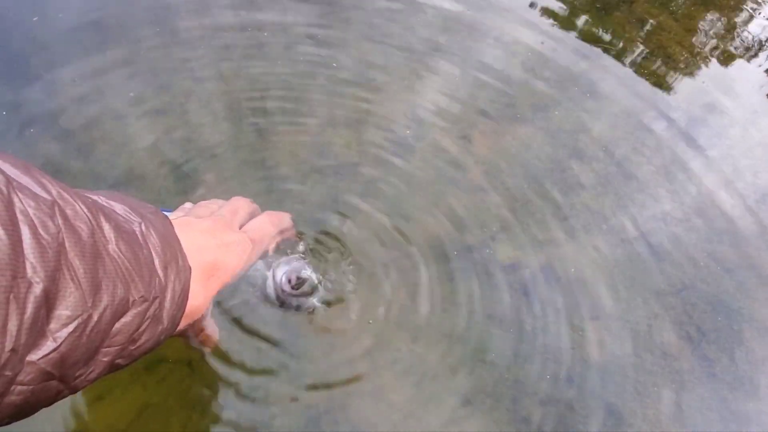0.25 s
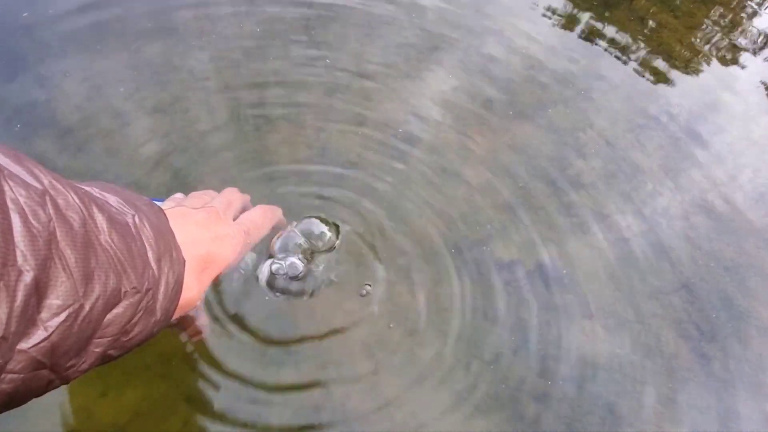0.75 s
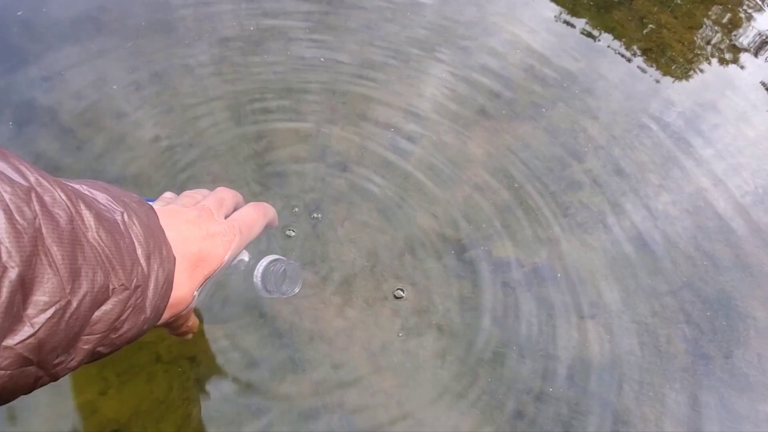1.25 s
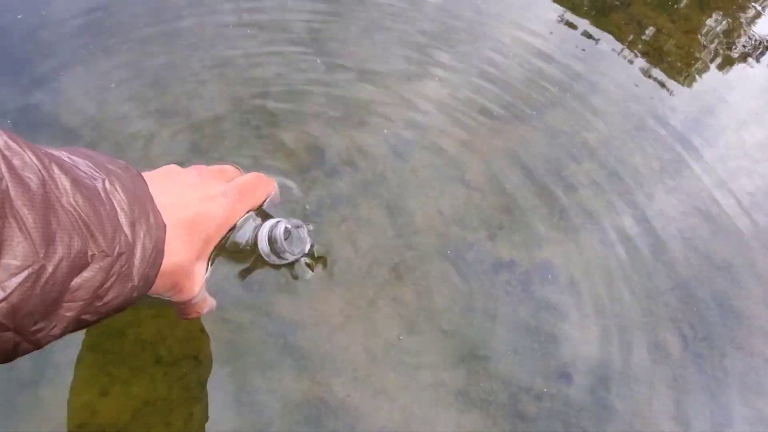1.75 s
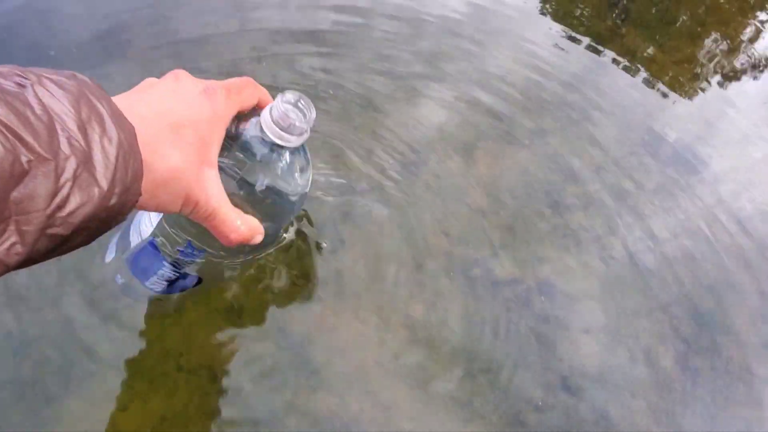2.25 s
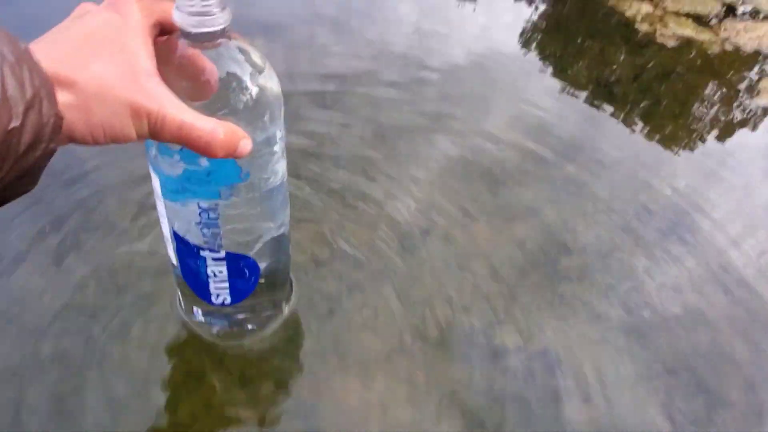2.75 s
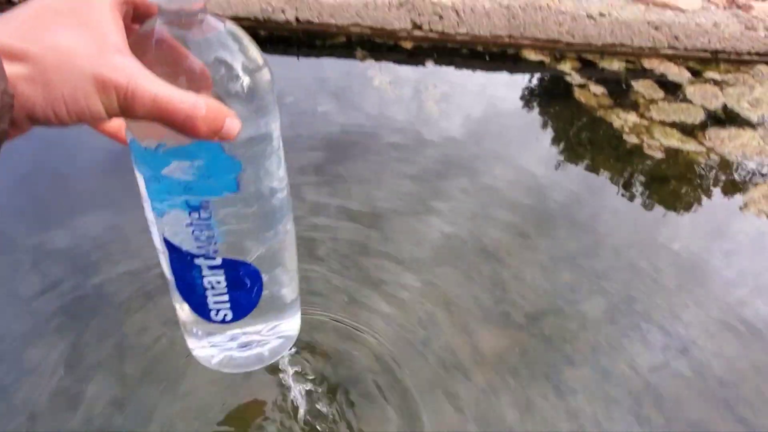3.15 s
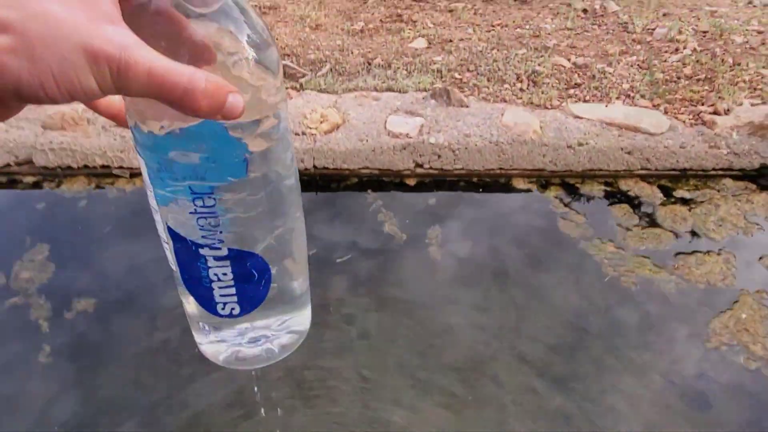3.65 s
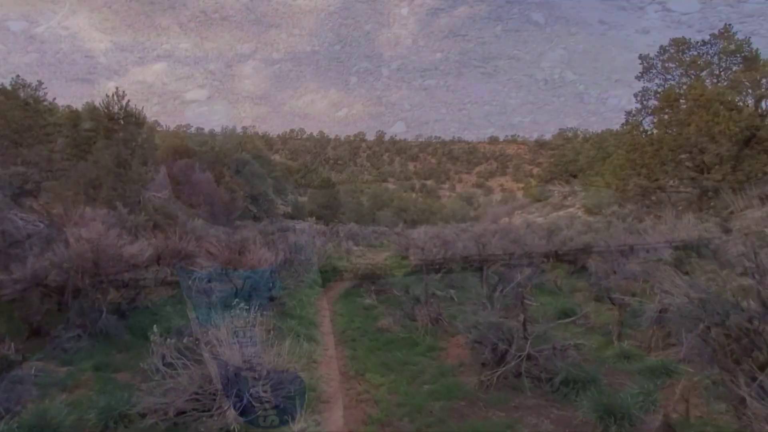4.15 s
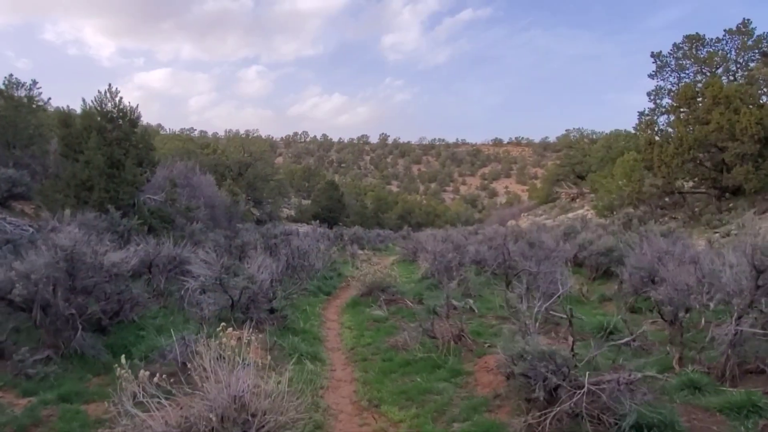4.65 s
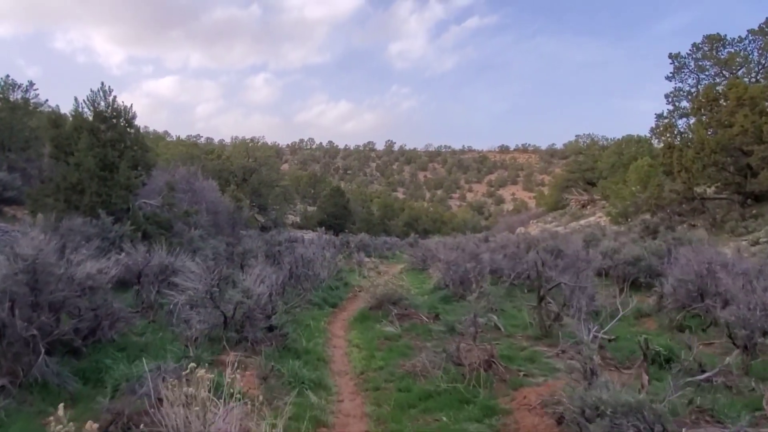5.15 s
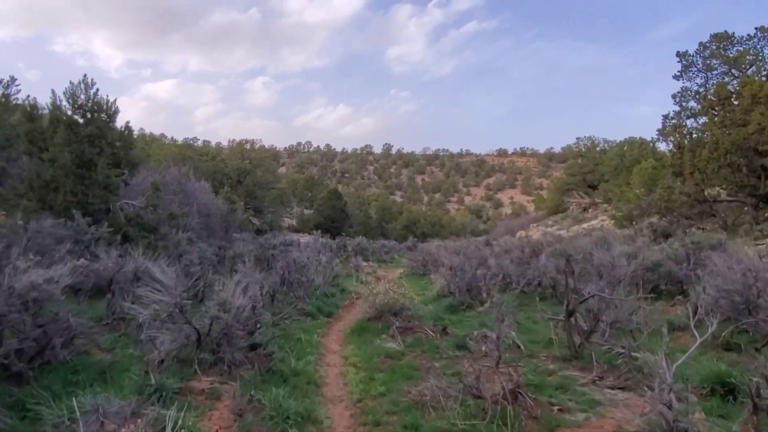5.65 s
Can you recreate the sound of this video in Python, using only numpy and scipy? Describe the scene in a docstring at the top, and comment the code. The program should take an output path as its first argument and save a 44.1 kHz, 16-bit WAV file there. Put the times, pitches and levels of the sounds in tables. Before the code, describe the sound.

Close, fast glugging of a bottle under water, small chirps over soft hollow knocks, stops early and leaves near silence with dull outdoor air. Later the lifted bottle drips: a crisp plip, pattering droplets and a short swell of hiss. The scene then changes to open ground, where strong gusts strike the unprotected microphone with deep, irregular thumps, flutter and small rustles, shifting between left and right.

```python
"""Bottle filling in a pond, then wind.

A plastic bottle held under a pond fills: bubbles leave its neck as rising chirps, and the air pocket
inside thumps as damped sines. Lifted out, it drips (noise cracks, ringing bubbles); airy hiss swells and
falls around the drips. Then, on open ground, gusts of shaped noise and damped low sines buffet two
microphone ports."""
import sys
import numpy as np
from scipy import signal
from scipy.fft import rfft, irfft
from scipy.io import wavfile
from scipy.ndimage import uniform_filter1d

SR = 44100
rng = np.random.default_rng(int(sys.argv[2]) if len(sys.argv) > 2 else 0)


def inscribe(sig):
    """Save sig as 16-bit PCM at rate SR to the path in sys.argv[1].

    A 1-D sig is mono; a 2-D sig holds one channel per row.
    Samples are clipped to [-1, 1] before scaling.
    """
    pcm = np.round(np.clip(np.atleast_2d(sig).T, -1, 1) * 32767)
    wavfile.write(sys.argv[1], SR, pcm.astype(np.int16))


N = 261072

# In all tables a positive left-right dB means louder on the left.
# Noise spectra. Each row: frequency in Hz, relative level in dB per Hz.
MURMUR_SPECTRUM = [(100, 8.5), (170, 8.5), (280, 4.5), (470, 6), (680, 2), (1400, -1), (2200, -2.5),
                   (3000, -9), (4200, -22.5), (7000, -42)]
HISS_SPECTRUM = [(1300, -5.5), (2200, 2.5), (3500, 1.5), (5000, -0.5), (6000, -10.5), (7300, -27.5),
                 (8500, -32)]
FINE_HISS_SPECTRUM = [(6500, -25), (7700, -21.5), (9000, -15.5), (10500, -11.5), (15000, -6), (17000, -9.5)]
RUMBLE_SPECTRUM = [(20, -19.5), (40, -7), (70, 3.5), (100, -5.5), (140, -9), (200, -17), (300, -24.5),
                   (600, -56)]
LIGHT_RUMBLE_SPECTRUM = [(20, -22), (40, -3), (70, 2), (105, -4), (150, -13), (300, -27.5)]
FLUTTER_SPECTRUM = [(100, -5.5), (200, 2), (310, 0), (450, -8), (600, -16), (850, -30), (1500, -43.5),
                    (4000, -58)]
# Level of the airy hiss. Each row: time in seconds, level in dB, left-right in dB.
HISS_LEVEL_CURVE = [(0, -72.5, 3), (.75, -73, 6), (1.15, -86.5, 10), (2, -73.5, 18), (4.15, -71.5, 17),
                    (4.27, -67.5, 9.5), (5.1, -68, 14.5), (5.7, -61.5, 9), (5.92, -66, 15)]
# Gusts on top of the steady wind. Each row: peak time in seconds, length in seconds, rumble level in dB,
# flutter level in dB, left-right in dB.
GUST_ROWS = [(.2, 0.49, -52, -65, 5), (0.79, 0.071, -51, -62, 1), (1.223, 0.21, -56.5, -86, 0),
             (1.822, 0.18, -50, -65, 4), (1.988, 0.054, -57, -62, 4), (3.17, 0.1, -52, -84, -7),
             (3.305, 0.11, -52, -79, -3), (3.554, 0.13, -52, -82, 13), (3.867, 0.068, -53, -84, -13),
             (4.001, 0.021, -27.5, -51, -14), (4.063, 0.05, -35, -61, 1), (4.23, 0.031, -25, -30.5, -1),
             (4.324, 0.14, -23, -38, 7), (4.424, 0.055, -18, -32.5, -7), (4.532, 0.04, -24, -32.5, 3.5),
             (4.637, 0.052, -24, -36, -5.5), (4.722, 0.16, -31, -39, -8), (4.794, 0.089, -24.5, -44, 0),
             (4.892, 0.041, -26, -40, -22), (5.038, 0.11, -29.5, -38.5, -4.5), (5.096, 0.029, -20, -47, 12),
             (5.208, 0.03, -34, -41, 5.5), (5.276, 0.11, -29.5, -36.5, 8), (5.425, 0.032, -37.5, -31, 8),
             (5.557, 0.039, -32, -31.5, -11), (5.596, 0.042, -22.5, -27, -11),
             (5.745, 0.064, -23.5, -27.5, 2), (5.897, 0.016, -44, -21, 6.5)]
# One port sheltered. Each row: middle in seconds, length in seconds, port (0 left, 1 right).
LULL_ROWS = [(3.772, 0.12, 0), (4.99, 0.097, 0), (5.136, 0.12, 1), (5.505, 0.038, 0), (5.63, 0.047, 1)]
# Bubbles leaving the neck. Each row: start in seconds, level in dB, start pitch in Hz,
# lifetime in seconds, swell time constant in seconds.
GLUG_ROWS = [(0.0538, -50, 1350, 0.0058, .0005), (.099, -47.5, 1580, 0.0042, 0.00022),
             (.157, -50, 1210, 0.003, 0.00044), (.194, -46.5, 1680, 0.0028, .0003),
             (.2578, -33, 830, 0.016, 0.00013), (0.308, -33.5, 1680, 0.0045, 0.00014),
             (.313, -46, 1960, 0.0062, .001), (0.3664, -35, 570, 0.016, 0.00021),
             (.3983, -39, 1270, 0.0047, 0.00014), (0.4052, -46, 1490, 0.0064, .0005),
             (.462, -42, 665, 0.017, 0.0065), (.5658, -44.5, 700, 0.016, 0.00042),
             (.587, -52, 1310, 0.0082, 0.00077), (0.5992, -31, 1535, 0.0028, 0.00046),
             (0.619, -36, 505, 0.02, 0.0099), (0.6565, -34.5, 703, 0.02, 0.00049),
             (.674, -43, 1200, 0.0065, .003), (.681, -40.5, 605, 0.0083, 0.0004),
             (0.6923, -33, 774, 0.023, 0.0001)]
# Mean climb of bubble pitch over a lifetime, slower as the bottle gets full.
# Each row: time in seconds, climb in Hz per second.
GLUG_CLIMB_CURVE = [(.37, 36000), (.47, 24900), (.66, 17250)]
# Air pocket jolted by each gulp. Each row: start in seconds, level in dB, start pitch in Hz,
# snap level in dB before the snap boost.
THUMP_ROWS = [(0.062, -36.5, 185.4, -61), (.099, -45, 118, -46), (0.1637, -30, 208, -70),
              (0.258, -38.5, 213, -38), (0.2684, -32.5, 200.5, -63), (.299, -63, 250, -37),
              (0.368, -45, 257, -49), (.377, -38, 227, -65), (.397, -45, 182, -35.5),
              (0.4612, -53, 207, -40), (0.469, -36.5, 201.5, -67), (.499, -38, 168, -36),
              (.5651, -36.5, 222.5, -70), (0.599, -38, 198, -33.5), (.656, -41.5, 190, -36.5)]
# Drops landing and small bubbles bursting. Each row: start in seconds, tick level in dB, ring level in dB,
# ring pitch in Hz, ring t60 in seconds, left-right in dB.
DROP_ROWS = [(0.068, -51, -51.5, 9060, 0.0092, 14), (0.2255, -53, -41, 3300, 0.0089, 9),
             (.3023, -53, -50, 11800, .003, 13), (0.4366, -59, -60, 3980, 0.013, 9),
             (.619, -56, -51, 3950, 0.012, 3), (.645, -52, -52, 5800, 0.0091, 2),
             (.826, -50.5, -53.5, 5750, 0.0075, 0), (3.1256, -33.5, -34, 1830, 0.045, -4),
             (3.1615, -57, -48, 6150, .011, -6), (3.206, -52, -42, 4130, 0.027, -5),
             (3.2179, -23.5, -44, 1150, 0.067, 6.5), (3.443, -65, -54, 11000, .006, 10),
             (3.6159, -37.5, -34, 2260, 0.012, 2), (3.635, -37, -52, 3900, 0.025, 3.5),
             (3.674, -57, -45.5, 1450, 0.051, -5), (3.817, -50.5, -59, 5830, .009, 7),
             (3.9087, -50, -52, 3970, 0.0047, 10)]
# Single eddies striking both ports. Each row: start in seconds, level in dB before the buffet trim,
# pitch in Hz.
BUFFET_ROWS = [(3.35, -30.5, 62), (4.112, -17, 70.5), (4.168, -19, 220), (4.222, -26, 77),
               (4.391, -9.5, 59), (4.408, -14, 64), (4.65, -8.5, 61), (4.711, -16, 60), (4.781, -9, 60),
               (5.294, -11, 130), (5.581, -8, 90), (5.7302, -5.5, 122)]
# Brief rustles and flaps in the wind. Each row: start in seconds, level in dB, centre in Hz,
# decay time constant in seconds, left-right in dB.
RUSTLE_ROWS = [(4.2235, -33, 1340, 0.0051, 7), (4.2516, -44.5, 1525, 0.013, -1),
               (4.293, -40.5, 720, 0.023, -1), (4.62, -42, 645, 0.014, 4.5), (4.71, -60.5, 2900, 0.11, 3),
               (4.745, -44.5, 1100, 0.012, -1.5), (4.815, -42, 1290, 0.0034, 3),
               (5.179, -57.5, 2070, 0.096, -1), (5.402, -47, 450, 0.0066, -6),
               (5.544, -28, 610, 0.0057, 5.5), (5.579, -47, 680, 0.051, -8), (5.661, -46.5, 1540, 0.022, 2),
               (5.669, -64.5, 3900, 0.053, -27), (5.735, -40.5, 500, 0.047, 3.5),
               (5.894, -43.5, 465, 0.039, 5)]

MURMUR_DB, FINE_HISS_DB = -61.5, -83.5
FINE_HISS_SHARE_DB = -16.5  # finest part of the varying hiss, relative to it
OPEN_GROUND_S, WIND_RISE_S = 3.955, 0.57
POND_WIND_DB, OPEN_WIND_DB, OPEN_FLUTTER_DB = -60, -33, -43.5
LULL_RUMBLE_DB = -22  # flutter drops by half as many dB
FIZZ_END_S = 1.0
THUMP_T60_S, THUMP_RISE_PER_S = 0.1, 7.5  # rise is relative to the start pitch
SWELL_S, SWELL_RISE_DB_PER_S, SWELL_FALL_DB_PER_S = 3.179, 35.5, 44
SWELL_MURMUR_DB, SWELL_HISS_DB, SWELL_FINE_DB = -56, -55.5, -59  # at the peak
SWELL_FINE_STEEPNESS = 1.8  # slope of the finest hiss in dB, relative to the rest
BOTTLE_LEAD_S, DROP_LEAD_S = 0.00015, 0.00005
CUTOFF_HZ = 16200


def from_db(db):
    """Decibels to gain."""
    return 10 ** (np.asarray(db) / 20)


def rms_one(x):
    """Scale to rms 1."""
    return x / np.sqrt(np.mean(x ** 2) + 1e-20)


def in_time(rows):
    """Each column of a curve, sample by sample."""
    s, *columns = np.transpose(rows)
    return [np.interp(np.arange(N) / SR, s, c) for c in columns]


def pan(db):
    """Left and right gains of constant total power."""
    gains = from_db(np.array([[.5], [-.5]]) * db)
    return gains / np.sqrt(np.mean(gains ** 2, axis=0))


def add(out, s, sound):
    """Mix a sound in at time s."""
    i = max(0, round(s * SR))
    out[..., i:i + sound.shape[-1]] += sound[..., :N - i]


def band(x, low_hz, high_hz):
    """Gentle band-pass."""
    sos = signal.butter(2, [low_hz, high_hz], "band", fs=SR, output="sos")
    return signal.sosfilt(sos, x + 1e-18)


def drift(rate_hz):
    """Two independent slow random curves of rms 1, drawn every 40 samples."""
    step, settle = 40, 2000
    pole = np.exp(-2 * np.pi * rate_hz * step / SR)
    draws = rng.standard_normal((2, N // step + settle + 2))
    slow = signal.lfilter([1], [1, -2 * pole, pole * pole], draws)[:, settle:]
    return np.array([np.interp(np.arange(N) / step, np.arange(len(v)), rms_one(v)) for v in slow])


def noise(spectrum, alike_below_hz):
    """Stereo noise of a given colour, shared by both ports at long wavelengths; rms 1."""
    hz = np.maximum(np.arange(N // 2 + 1) * SR / N, 1)
    points_hz, points_db = np.transpose(spectrum)
    gain = from_db(np.interp(np.log(hz), np.log(points_hz), points_db, left=-90, right=-90))
    alike = 1 / (1 + (hz / alike_below_hz) ** 2)
    mid, side = rfft(rng.standard_normal((2, N)))
    ports = np.sqrt(1 + alike) * mid + np.sqrt(1 - alike) * side * [[1], [-1]]
    return rms_one(irfft(gain * ports, N))


def steady(x, window_s):
    """Even out the slow swings of a noise so that a gust curve can drive it."""
    power = uniform_filter1d(np.mean(x ** 2, axis=0), max(2, int(window_s * SR)))
    return x / np.sqrt(power + 1e-9)


def ring(hz, t60_s):
    """A damped sine of initial height 1."""
    t = np.arange(int(t60_s * SR) + 2) / SR
    return np.sin(2 * np.pi * hz * t) * from_db(-60 * t / t60_s)


def hump(s, length_s):
    """A flat-topped rise to 1 and fall around time s, half as high at the ends of its length."""
    away = np.minimum(np.abs(np.arange(N) / SR - s) / (.5 * length_s), 4)
    return .5 ** (away ** 3)


def left_first(x, lead_s):
    """Sound from the left reaches the right port a little later."""
    return np.array([x[0], np.roll(x[1], round(lead_s * SR))])


def air():
    """A steady dull outdoor murmur, with a left-leaning hiss over it that grows on open ground."""
    hiss_db, side_db = in_time(HISS_LEVEL_CURVE)
    murmur = from_db(MURMUR_DB) * noise(MURMUR_SPECTRUM, alike_below_hz=510)
    hiss = from_db(hiss_db) * noise(HISS_SPECTRUM, alike_below_hz=740) * pan(side_db)
    fine_gain = np.hypot(from_db(FINE_HISS_DB), from_db(hiss_db + FINE_HISS_SHARE_DB))
    fine = fine_gain * noise(FINE_HISS_SPECTRUM, alike_below_hz=500) * pan(db=3.0)
    return murmur + hiss + fine


def wind_strength():
    """Rumble and flutter gains at each port: powers of steady wind and gusts add, lulls shelter."""
    opened = np.clip((np.arange(N) / SR - OPEN_GROUND_S) / WIND_RISE_S, 0, 1)
    rumble_power = from_db(POND_WIND_DB) ** 2 + (opened * from_db(OPEN_WIND_DB)) ** 2
    flutter_power = (opened * from_db(OPEN_FLUTTER_DB)) ** 2
    for s, length_s, rumble_db, flutter_db, side_db in GUST_ROWS:
        gust_power = (hump(s, length_s) * pan(side_db)) ** 2
        rumble_power = rumble_power + from_db(rumble_db) ** 2 * gust_power
        flutter_power = flutter_power + from_db(flutter_db) ** 2 * gust_power
    shelter = np.ones((2, N))
    for s, length_s, port in LULL_ROWS:
        shelter[int(port)] *= from_db(LULL_RUMBLE_DB * hump(s, length_s))
    return np.sqrt(rumble_power) * shelter, np.sqrt(flutter_power * shelter)


def gusts(lumpy_db=5.5, flutter_lumpy_db=7.0):
    """Turbulence varies at each port on its own, more alike in light air; strong eddies flutter higher up."""
    rumble_gain, flutter_gain = wind_strength()
    eddies_db = lumpy_db * drift(13.7)
    flutter_db = eddies_db + flutter_lumpy_db * drift(22)
    rumble = steady(noise(RUMBLE_SPECTRUM, alike_below_hz=29) * from_db(eddies_db), window_s=.05)
    flutter = steady(noise(FLUTTER_SPECTRUM, alike_below_hz=140) * from_db(flutter_db), window_s=.06)
    light = steady(noise(LIGHT_RUMBLE_SPECTRUM, alike_below_hz=110) * from_db(eddies_db), window_s=.08)
    low = np.where(np.arange(N) / SR < OPEN_GROUND_S, light, rumble)
    return rumble_gain * low + flutter_gain * flutter


def fizz(count=30, top_level_db=-43, range_db=16, low_hz=10500, high_hz=15000):
    """Tiny bubbles left by the gulps burst at random on the surface with dry ticks, most of them early."""
    out = np.zeros(N)
    for when, size, pitch in rng.random((count, 3)):
        gain = from_db(top_level_db + range_db * (size - 1))
        hz = low_hz + pitch * (high_hz - low_hz)
        add(out, when ** 2 * FIZZ_END_S, gain * ring(hz, t60_s=.0015))
    return band(out, low_hz, high_hz) * pan(db=5.5)


def glugs(fade_power=6.1, overtone_db=-26, waver=0.04, shimmer_db=1.0):
    """Each bubble's pitch rises as it nears the surface; its wobbling shape roughens the note."""
    out, t = np.zeros(N), np.arange(SR // 12) / SR
    wobble, shimmer = drift(95)
    for s, db, start_hz, life_s, swell_s in GLUG_ROWS:
        age = t / life_s
        now = slice(int(s * SR), int(s * SR) + len(t))
        rise_hz = life_s * np.interp(s, *np.transpose(GLUG_CLIMB_CURVE))
        climbing_hz = start_hz + rise_hz * np.tanh(age / 2) / np.tanh(.5)
        phase = 2 * np.pi * np.cumsum(climbing_hz * (1 + waver * wobble[now])) / SR
        envelope = (1 - np.exp(-t / swell_s)) / (1 + age ** fade_power)
        envelope = envelope * from_db(shimmer_db * shimmer[now])
        tone = np.sin(phase) + from_db(overtone_db) * np.sin(2 * phase)
        add(out, s, from_db(db) * envelope * tone)
    return out


def spatter(count=4, below_db=-23, within_s=.018, low_hz=1300, high_hz=3800, cycles=36):
    """Every bubble sheds a few tiny ones, which ring more faintly, mostly higher, just after it."""
    out = np.zeros(N)
    for s, db, *_ in GLUG_ROWS:
        for when, pitch in rng.random((count, 2)):
            hz = low_hz * (high_hz / low_hz) ** pitch
            add(out, s + when * within_s, from_db(db + below_db) * ring(hz, cycles / hz))
    return out


def thumps(snap_s=0.00078, snap_boost_db=7.0):
    """Trapped air springs against the neck water, rising in pitch; the pinch-off adds a pressure snap."""
    out, snaps, t = np.zeros(N), np.zeros(N), np.arange(SR // 6) / SR
    dying = from_db(-60 * t / THUMP_T60_S)
    for s, db, hz, snap_db in THUMP_ROWS:
        phase = 2 * np.pi * hz * (t + THUMP_RISE_PER_S * t ** 2 / 2)
        add(out, s, from_db(db) * dying * np.sin(phase))
        add(snaps, s, from_db(snap_db + snap_boost_db) * np.exp(-t / snap_s))
    return out + band(snaps, 233, 1000)


def drops(crack_hz=4400, spray_db=-12, top_db=2):
    """A sharp crack with a little spray at the surface, and the ring of the small bubble under it."""
    out, t = np.zeros((2, N)), np.arange(SR // 50) / SR
    crack = band(ring(crack_hz, t60_s=.003), 2800, 6200)
    for s, db, ring_db, hz, t60_s, side_db in DROP_ROWS:
        spray = from_db(spray_db) * rng.standard_normal(len(t)) * np.exp(-t / .0012)
        click = t == 0
        splash = band(spray, 1700, 4000) + from_db(top_db) * band(spray + click, 8900, 13000)
        add(out, s, from_db(db) * pan(side_db) * splash)
        add(out, s, from_db(db) * pan(side_db) * crack)
        add(out, s, from_db(ring_db) * pan(side_db) * ring(hz, t60_s))
    return out


def swell():
    """A wash of airy hiss rises and falls around the drips, brightest at its peak."""
    t = np.arange(N) / SR - SWELL_S
    db = np.minimum(SWELL_RISE_DB_PER_S * t, -SWELL_FALL_DB_PER_S * t)
    murmur = from_db(SWELL_MURMUR_DB) * noise(MURMUR_SPECTRUM, alike_below_hz=530)
    hiss = from_db(SWELL_HISS_DB) * noise(HISS_SPECTRUM, alike_below_hz=270)
    fine_gain = from_db(SWELL_FINE_DB + SWELL_FINE_STEEPNESS * db)
    fine = fine_gain * noise(FINE_HISS_SPECTRUM, alike_below_hz=500) * pan(db=4)
    return from_db(db) * (murmur + hiss) + fine


def trickle(count=36, level_db=-54, spread_db=3, middle_s=3.17, spread_s=.11,
            centre_hz=2800, spread_octaves=0.81, cycles=22):
    """Fine droplets run off the lifted bottle and patter on the pond, each a short ring."""
    out = np.zeros((2, N))
    for when, size, pitch, side in np.clip(rng.standard_normal((count, 4)), -2, 2):
        hz = centre_hz * 2 ** (spread_octaves * pitch)
        gains = from_db(level_db + spread_db * size) * pan(db=3 * side)
        add(out, middle_s + spread_s * when, gains * ring(hz, cycles / hz))
    return out


def buffets(cycles=3.8, trim_db=-1):
    """A large eddy shoves both diaphragms, which swing back within a cycle or two."""
    out = np.zeros(N)
    for s, db, hz in BUFFET_ROWS:
        add(out, s, from_db(db + trim_db) * ring(hz, cycles / hz))
    return band(out, 32, 300)


def rustles(width=1.31, attack_s=0.0019):
    """Bursts of rough noise that start abruptly and die away, different at each port."""
    out, t = np.zeros((2, N)), np.arange(SR // 4) / SR
    for s, db, hz, decay_s, side_db in RUSTLE_ROWS:
        grain = rms_one(band(rng.standard_normal((2, len(t))), hz / width, hz * width))
        envelope = (1 - np.exp(-t / attack_s)) * np.exp(-t / decay_s)
        add(out, s, from_db(db) * pan(side_db) * grain * envelope)
    return out


def scene():
    """The bottle neck lies left of centre; the drops fall nearly in front."""
    wind = gusts() + buffets() + rustles()
    bottle = left_first((glugs() + spatter() + thumps()) * pan(db=1.5), BOTTLE_LEAD_S)
    surface = left_first(fizz() + drops() + trickle(), DROP_LEAD_S)
    return air() + bottle + surface + swell() + wind


def record(dry):
    """The sound closes with a 5 ms fade and the top is cut."""
    closing = np.clip((N - 1 - np.arange(N)) / (.005 * SR), 0, 1)
    low_pass = signal.ellip(10, .1, 80, CUTOFF_HZ, fs=SR, output="sos")
    return signal.sosfilt(low_pass, dry * closing)


dry = scene()
out = record(dry)
inscribe(out)
```